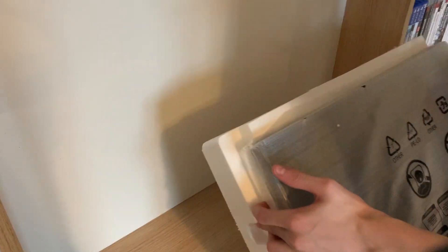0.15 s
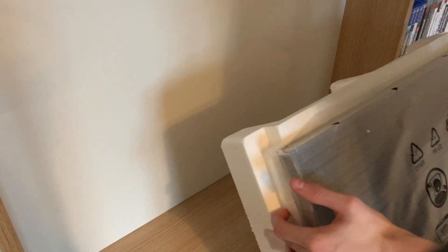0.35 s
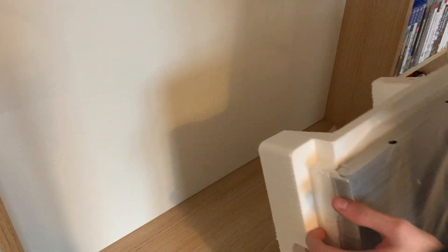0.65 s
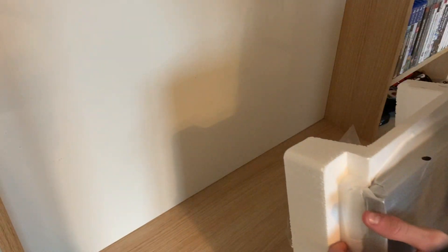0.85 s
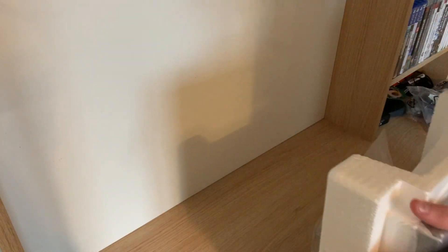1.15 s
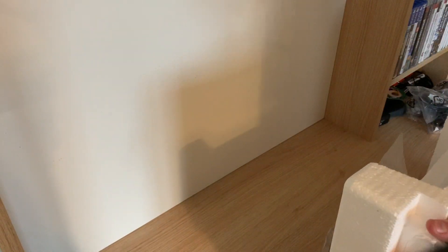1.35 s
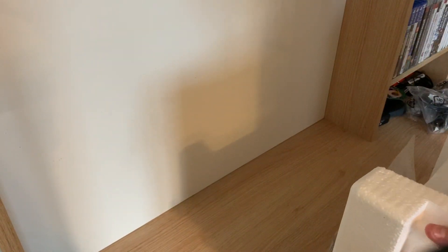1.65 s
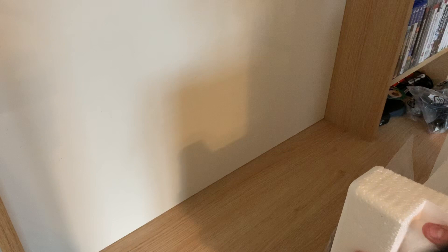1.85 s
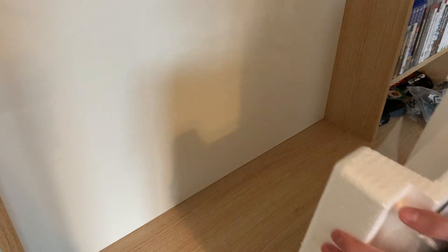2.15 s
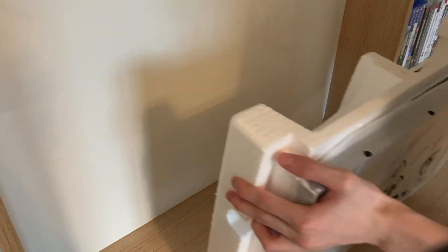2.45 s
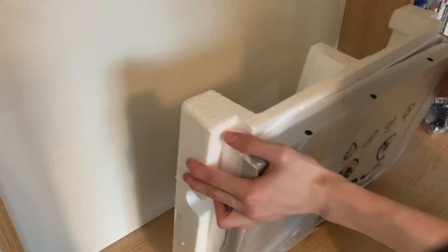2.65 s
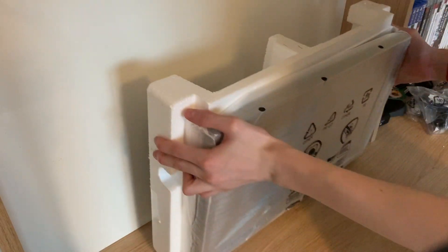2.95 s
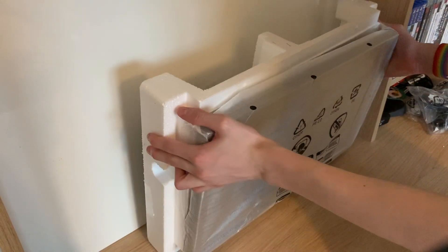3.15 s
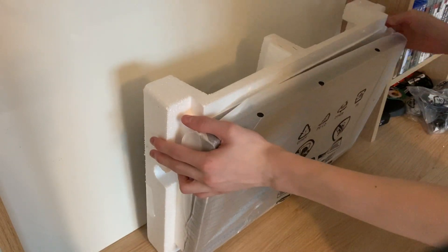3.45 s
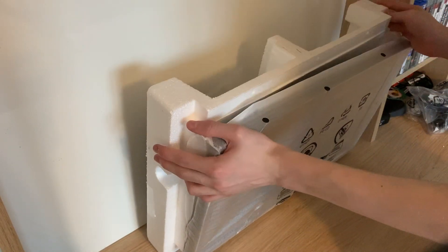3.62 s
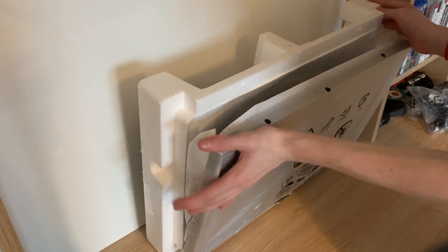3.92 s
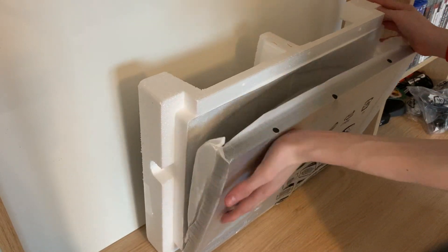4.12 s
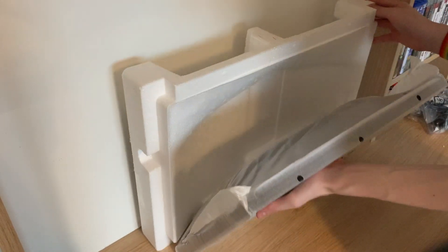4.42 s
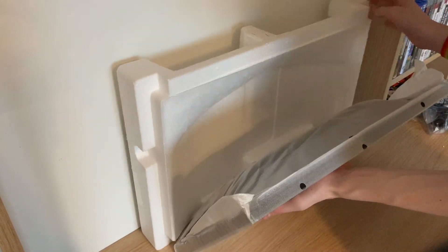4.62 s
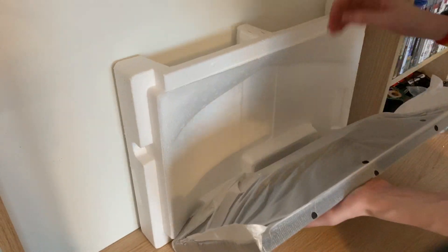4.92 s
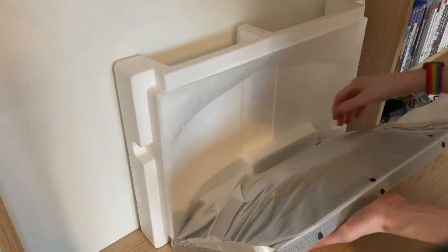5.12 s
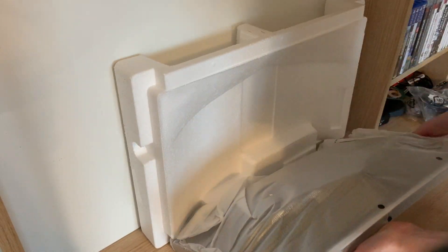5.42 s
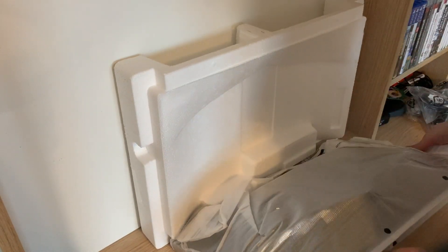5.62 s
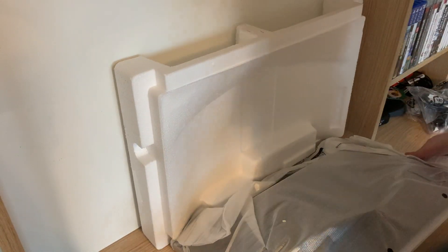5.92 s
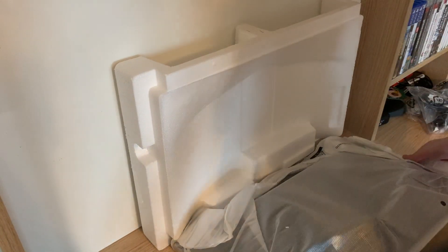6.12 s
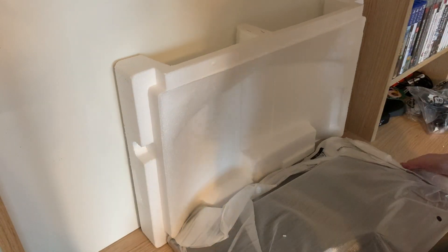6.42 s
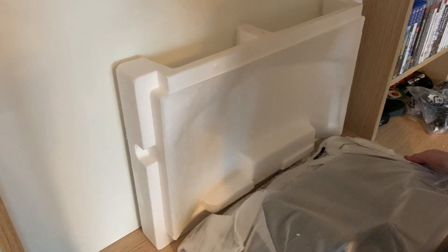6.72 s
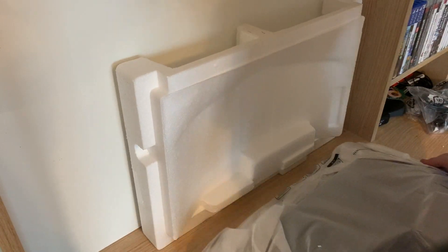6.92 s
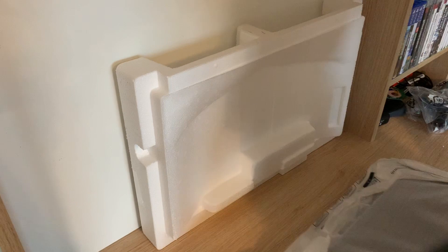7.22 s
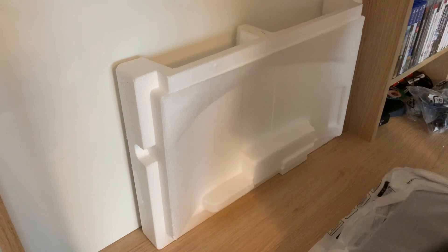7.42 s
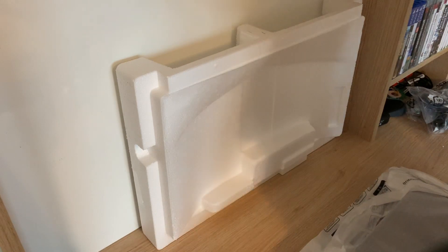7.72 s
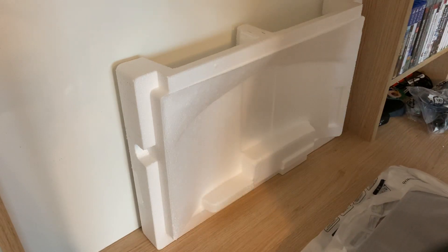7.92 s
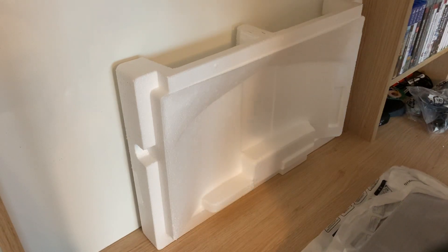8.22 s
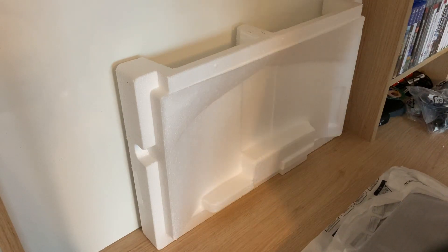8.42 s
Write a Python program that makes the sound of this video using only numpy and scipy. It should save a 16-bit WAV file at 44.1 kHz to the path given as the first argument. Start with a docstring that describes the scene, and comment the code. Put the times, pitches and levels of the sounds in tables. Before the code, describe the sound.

Hands set a foam packing tray on a wooden desk with hollow knocks, rubs and squeaks, then slide out a crinkling plastic-sleeved item.

```python
"""A short rub of foam and a patter of hollow knocks: hands carry a polystyrene packing tray over a wooden desk,
stand it on edge, ease a flat item in a plastic sleeve out, lower it and nudge it into place.
Rub, hiss, crinkle and drag are showers of tiny noise grains; slips are noise bursts that ring the tray;
scrapes and squeaks glide in pitch; bumps are damped thuds over a booming desk top.
A small room answers; a camera with closely spaced microphones stands near."""
import sys
import numpy as np
from scipy import signal
from scipy.fft import rfft, irfft, next_fast_len
from scipy.io import wavfile
from scipy.ndimage import uniform_filter1d, map_coordinates

SR = 44100
rng = np.random.default_rng(int(sys.argv[2]) if len(sys.argv) > 2 else 0)


def dump(signal):
    """Clip the signal to [-1, 1] and save it as 16-bit WAV at the path in sys.argv[1]."""
    limited = np.clip(np.atleast_2d(signal).T, -1, 1)
    pcm = np.round(limited * 32767).astype(np.int16)
    wavfile.write(sys.argv[1], SR, pcm)


N = 377496

# All levels are fader settings, trimmed again where each layer is mixed.
# faint air noise behind everything: [f/Hz, level/dB]
AIR = [(15, -76), (25, -32.5), (43, -12), (66, -12), (105, -20), (796, -35.5), (1020, -31), (5880, -44.5),
       (8140, -46), (16000, -50.5)]
# decay of the small room: [f/Hz, t60/s]
ROOM = [(100, 0.41), (400, 0.29), (1100, 0.25), (3000, 0.41), (8000, 0.24), (16000, 0.15)]
# left-right correlation at the microphones, ahead of the widening: [f/Hz, correlation -1..1]
ALIKE = [(100, 0.85), (300, 0.8), (500, 0.49), (800, 0.34), (1500, 0.37), (2000, -0.025), (3300, -0.19),
         (4300, 0.64), (5300, -0.29), (6500, 0.63), (7500, -0.13)]
# shifting weight makes the desk rumble: [start t/s, swell t/s, fade t/s, level/dB]
SHIFTS = [(0.03, 0.093, 0.24, -54), (0.5, 0.1, 1, -55.5), (1.429, 0.034, 0.41, -47),
          (1.65, 0.27, 0.23, -44), (2.751, 0.37, 0.18, -54.5), (3.23, 0.039, 0.09, -39.5),
          (3.509, 0.024, 0.14, -42), (4.12, 0.3, 0.6, -51.5), (6.23, 0.13, 0.18, -56.5),
          (7.25, 0.071, 0.24, -51.5), (7.599, 0.071, 0.15, -48.5), (8.24, 0.032, 0.15, -50)]
# colour of that rumble: [f/Hz, level/dB]
RUMBLE = [(25, -21), (45, -9), (61, -1.5), (85, -13), (135, -0.5), (175, -5.5), (240, -4), (330, -19),
          (600, -24.5)]
# weight bears on the desk:
# [t/s, contact t/s, thud level/dB, thud f/Hz, boom level/dB near 60 Hz, drone level/dB near 135 Hz]
BUMPS = [(.283, 0.0026, -31, 287, -72, -77), (.514, 0.0036, -38, 277, -72, -64.5),
         (0.789, .006, -54, 150, -61, -56), (1.089, .003, -50, 140, -56, -57),
         (1.121, 0.0027, -42.5, 252, -63, -62), (1.657, 0.0023, -30, 336, -55, -43),
         (1.684, 0.0024, -25.5, 198, -44, -38), (2.073, 0.0033, -33, 275, -60.5, -81),
         (2.797, 0.0017, -29, 396, -43.5, -46.5), (3.039, 0.0013, -21, 300, -39.5, -44),
         (3.276, 0.003, -31, 285, -62, -47), (3.532, 0.0017, -28, 290, -46, -41),
         (3.688, 0.0028, -30.5, 366, -61, -59.5), (4.29, 0.0043, -22, 232, -43, -41),
         (4.311, 0.0015, -21.5, 275, -37, -45), (4.336, 0.0018, -31, 198, -32.5, -52),
         (4.366, .0012, -23, 255, -58, -57), (4.422, 0.0014, -23, 242, -34.5, -45),
         (4.686, 0.0011, -32.5, 224, -61, -53), (5.453, 0.0028, -46, 253, -67, -70),
         (6.257, 0.0043, -43, 306, -72, -74), (6.298, .003, -38.5, 324, -66, -70),
         (6.357, 0.0047, -37.5, 403, -71, -72), (6.38, .008, -43, 261, -57, -66),
         (7.258, .002, -24.5, 232, -56, -62), (7.268, .0009, -19, 315, -40, -47),
         (7.32, 0.0081, -30, 310, -44, -60), (7.706, 0.0013, -39.5, 634, -70, -73),
         (7.719, .0009, -33, 200, -59, -55.5), (8.094, 0.0057, -34, 198, -48, -53),
         (8.125, .004, -44, 139, -53, -61)]
# ringing modes of the desk top: [f/Hz, level/dB, t60/s]
DESK_MODES = [(59.7, 0.5, .46), (135.2, 0.5, 0.36), (199, -10.5, 0.34), (231.5, -3.5, 0.27),
              (310.8, -3.5, 0.15), (404, -13.5, .15), (484, -10, 0.31), (616, -12, 0.4), (750, -16.5, .22)]
# colour of the noise in a thud: [f/Hz, level/dB]
THUD = [(60, -33), (150, -0.5), (250, 1.5), (380, -12), (550, -11.5), (900, -18.5), (2000, -45),
        (5000, -78.5)]
# brief stick-slip squeaks: [t/s, length t/s, start f/Hz, end f/Hz, level/dB]
SQUEAKS = [(1.446, 0.033, 428, 544, -35.5), (1.467, 0.024, 1303, 1990, -37.5),
           (1.485, .045, 1990, 2460, -47), (1.463, 0.068, 695.5, 661, -40), (1.516, 0.055, 678, 605, -40),
           (6.485, 0.0916, 556.4, 724, -42), (7.889, 0.022, 720, 520, -54), (8.049, 0.024, 756, 640, -51.5)]
# a foam edge scrapes along, pitch following speed: [t/s, length t/s, start f/Hz, end f/Hz, level/dB]
SCRAPES = [(2, 0.16, 522.4, 1918, -52.5), (1.8, 0.06, 790, 891, -51.5), (1.9796, .03, 1667, 1700, -37.5),
           (2.006, 0.017, 1200, 660, -41), (3.54, .065, 2200, 1250, -53), (3.863, .11, 1020, 1404, -53),
           (4.14, 0.24, 1291, 2000, -48), (1.47, 0.14, 760, 620, -45.5), (4.418, .035, 1800, 750, -45)]
# colour of a foam edge scraping at middling speed: [f/Hz, level/dB]
EDGE = [(200, -32.5), (600, -11.5), (820, -3.5), (1000, -5.5), (1250, -5.5), (1900, -13.5), (2800, -20.5),
        (4500, -40.5)]
# each push or pull of the hands: [start t/s, swell t/s, fade t/s, rub level/dB, sleeve hiss level/dB]
STROKES = [ (0.0, 0.0005, 0.062, -46.5, -53.5), (0.09, 0.16, 0.2, -53, -65.5),
           (0.44, 0.19, 0.21, -57.5, -61.5), (0.728, 0.021, 0.25, -51, -59),
           (0.871, 0.23, .24, -51.5, -46.5), (1.07, 0.056, 0.042, -63, -41),
           (1.27, 0.07, .07, -46.5, -53.5), (1.439, 0.084, 0.2, -48.5, -40.5),
           (1.62, 0.058, 0.043, -37.5, -47), (1.749, 0.1, 0.15, -38, -55), (1.838, 0.066, 0.11, -57, -37.5),
           (1.958, 0.035, 0.069, -35.5, -60), (2.357, 0.026, 0.15, -54, -57),
           (2.78, 0.023, 0.054, -41.5, -41), (2.96, 0.042, 0.21, -42, -51.5),
           (3.23, 0.074, 0.21, -52.5, -55), (3.455, 0.079, 0.038, -39, -41),
           (3.57, 0.067, 0.22, -50, -60.5), (3.68, 0.044, 0.13, -53, -51), (3.8, 0.067, 0.27, -50.5, -50),
           (4.02, 0.17, 0.073, -45, -44), (4.2, 0.1, 0.11, -41, -38), (4.35, 0.055, 0.47, -48.5, -49),
           (4.571, 0.11, 0.077, -44.5, -47.5), (4.689, 0.3, 0.1, -62.5, -50.5), (5.05, 0.13, 0.2, -59, -57),
           (5.343, 0.16, 0.24, -54, -50.5), (5.682, 0.12, 0.32, -46, -48), (5.981, 0.25, 0.43, -54.5, -51),
           (6.229, 0.089, 0.1, -46.5, -55), (6.453, 0.075, 0.066, -39.5, -54.5),
           (6.47, 0.2, 0.29, -56, -51), (7.243, 0.014, 0.15, -51.5, -63), (7.31, 0.18, 0.31, -59, -53.5),
           (7.559, 0.12, 0.17, -53.5, -54), (7.848, 0.066, 0.032, -58.5, -57.5),
           (7.948, 0.13, 0.055, -56, -57), (8.217, 0.04, 0.053, -57.5, -60.5),
           (8.38, 0.14, .1, -68.5, -68.5)]
# colour of foam beads rubbing: [f/Hz, level/dB]
RUB = [(100, -38.5), (170, -14.5), (324, -4), (371, -15.5), (462, 1), (568, -10), (625, -3), (757, -4.5),
       (1540, -9), (3070, -19), (3330, -19), (4500, -15), (5850, -32), (9900, -120)]
# colour of the sleeve dragging over the desk: [f/Hz, level/dB]
DRAG = [(100, -58), (220, -7.5), (310, -10), (450, -0.5), (540, -3), (640, -3), (800, -5.5), (1000, -2.5),
        (1300, -7), (1900, -11), (3200, -14.5), (6000, -16)]
# resonances of the flat item as it drags: [f/Hz, width f/Hz, level/dB]
PANEL = [(285.5, 41, -3), (470, 58, 0.5), (554, 69, -1.5), (636, 58, 0.5), (940, 120, -6), (1220, 70, -1.5),
         (1506, 130, -6.5)]
# colour of the sleeve's hiss: [f/Hz, level/dB]
HISS = [(900, -21), (1800, -6), (2900, -2.5), (3500, -5.5), (5500, -2.5), (7000, -2.5), (8800, 2.5),
        (11000, 1), (16000, -1)]
# colour of crunching beads and of the crinkling sleeve: [f/Hz, level/dB]
CRUNCH = [(400, -4), (1500, -3), (2800, -3.5), (3600, -3.5), (5500, 0.5), (6900, 2.5), (9000, 4),
          (12000, 2), (16000, -1.5)]
# resonances of the foam walls in a hard clack: [f/Hz, width f/Hz, level/dB]
CLACK = [(850, 280, -5.5), (1040, 310, -4), (1420, 420, -7.5), (1610, 230, -6), (1937, 860, -17),
         (2893, 310, -5.5)]
# resonances of the hollow foam tray: [f/Hz, width f/Hz, level/dB]
HOLLOW = [(286, 103, 2.5), (460, 140, -0.5), (645, 80, -1)]
# ringing modes of the tray: [f/Hz, level/dB, t60/s]
TRAY_MODES = [(289.4, 6.5, 0.062), (415, 1.5, 0.047), (619, 0.5, 0.065), (828, 0.5, 0.13),
              (1102, -5.5, 0.082), (1320, -12, 0.032), (1664, -8.5, 0.052), (2940, -24, 0.069)]
# the foam catches and lets go:
# [t/s, length t/s, crunch level/dB, clack level/dB, clack f/Hz, hollow knock level/dB, knock f/Hz]
SLIPS = [(0.091,0.0072,-54,-48.5,1078,-41.5,292), (0.115,0.0038,-34,-44,1280,-40.5,287),
         (0.142,0.0068,-49,-45,988,-39,295), (.169,0.0058,-47.5,-43,790,-36.5,280),
         (0.19,0.0055,-42.5,-44,896,-37.5,270), (0.232,.003,-39.5,-54,1100,-44,290),
         (0.25,0.0059,-28,-40,952,-33.5,275), (0.275,.0029,-26,-37.5,950,-36,280),
         (.283,0.0065,-49,-44,813,-33.5,263), (0.364,0.0028,-29.5,-40.5,1910,-58,293),
         (0.509,0.0031,-31,-62,1270,-45,275), (0.555,0.0071,-42,-49,836,-40.5,294),
         (0.579,0.0073,-36.5,-47,900,-41,282), (0.617,0.0058,-39.5,-47,920,-41,292),
         (0.638,.005,-53,-55,800,-45,283), (0.754,0.0087,-32,-53,800,-43,290),
         (0.999,0.0065,-34.5,-43.5,900,-50,326), (1.088,0.0048,-32.5,-45,875,-56,320),
         (1.288,0.0048,-37.5,-41,776,-40.5,240), (1.35,0.0052,-32.5,-58,1125,-36.5,468),
         (1.3966,0.0045,-30,-45,1086,-49,285), (1.421,0.0077,-27,-57,1660,-49,430),
         (1.445,0.0083,-43,-34.5,736,-31,433), (1.493,.0089,-20.5,-41.5,751,-54,690),
         (1.652,0.0092,-25,-36.5,854,-29,308), (1.757,0.0077,-62.5,-41,653,-27.5,418),
         (1.964,0.0081,-14,-45,1303,-43,288), (1.975,0.0051,-25,-21.5,1433,-25.5,398),
         (2.002,0.0058,-23.5,-26.5,943,-25,428), (2.066,0.0052,-13.5,-38,1078,-27,272),
         (2.073,0.0052,-26.5,-45,603,-31,326), (2.351,0.0053,-39,-55.5,1525,-71,320),
         (2.368,0.0085,-22.5,-47,1166,-50,740), (2.378,0.0072,-22,-45,1390,-36,254),
         (2.435,0.0042,-36,-46,918,-46,285), (2.471,0.0047,-32,-40,952,-40.5,390),
         (2.502,0.005,-35.5,-42.5,1000,-40,356), (2.688,0.0095,-36,-47.5,897,-45.5,480),
         (2.758,0.0075,-42.5,-50,1110,-46.5,370), (2.787,0.0073,-22.5,-37,1363,-38,300),
         (2.796,0.0071,-19,-31.5,651,-24.5,472), (2.978,0.0033,-34.5,-46.5,913,-43.5,363),
         (3.005,0.0068,-14,-31,923,-24.5,470), (3.032,0.0052,-24,-35,1313,-26,390),
         (3.036,0.0062,-13,-18,1020,-14.5,331), (3.057,0.0059,-35.5,-38.5,1237,-27.5,314),
         (3.258,0.0051,-22,-30,1053,-32.5,295), (3.275,0.0038,-17.5,-30,1074,-30.5,400),
         (3.322,0.0089,-24,-38.5,1135,-33,300), (3.53,0.0077,-28.5,-33.5,966,-28.5,295),
         (3.544,.004,-34.5,-38,1122,-45,400), (3.686,0.0024,-24.5,-44.5,850,-37.5,302),
         (3.689,0.0055,-40.5,-35,777,-36.5,327), (3.752,0.0074,-40.5,-39.5,837,-47,380),
         (3.762,0.0037,-42.5,-45,1300,-52,330), (3.779,0.0058,-42.5,-44,826,-47,323),
         (3.885,0.0071,-40.5,-52,1165,-38,338), (3.914,0.0038,-42.5,-45,1382,-51,310),
         (3.944,0.0033,-40.5,-45,1160,-47,310), (4.026,0.0039,-40,-55,910,-44,355),
         (4.084,0.0058,-36.5,-46.5,1007,-41.5,355), (4.089,0.0064,-27,-42.5,1202,-45,390),
         (4.163,0.0031,-38.5,-43,1113,-50,324), (4.363,0.0046,-35,-46,1240,-29.5,386),
         (4.42,0.0075,-29,-36.5,1100,-27,402), (4.595,0.0053,-29,-64,940,-56,400),
         (4.635,0.0068,-38,-47,900,-46,420), (4.649,0.0089,-26,-38,1116,-43,544),
         (4.708,.005,-38.5,-41,980,-47,400), (5.413,0.0042,-34,-52.5,1540,-65,544),
         (5.443,0.0062,-41.5,-44.5,1120,-48,566), (6.726,0.0066,-41,-46.5,1130,-49,570),
         (7.095,0.0031,-57,-70,1500,-72,399), (7.251,0.0049,-62,-38.5,1300,-31,488),
         (7.26,0.0081,-60,-42,730,-31.5,506), (7.268,0.008,-58,-45,744,-29,483),
         (7.664,0.0069,-45,-48,836,-50,260), (8.312,0.0034,-47,-47,1113,-45,212)]

TOP_HZ = 15850  # nothing is heard from here up
EDGE_HZ = 1000  # pitch of the edge's rasp at normal speed
ON_DESK, CROSSFADE = 4.69, 0.89  # s: the sleeve starts to drag on the desk, and takes over from the foam
# flanks of a stroke (1 = straight ramps); desk rumble relative to the rub, dB
SWELL_POWER, RUB_SHAKE_DB = 0.78, -16.5
# knock delay as a share of the slip's length; t60 of the flexing foam wall in cycles
KNOCK_LAG, FLEX_CYCLES = 0.296, 12.3
# t60 of a thud: so many cycles plus so many contact times
THUD_CYCLES, THUD_CONTACTS = 9.2, 14


def amp(db):
    """Decibels to gain."""
    return 10 ** (np.asarray(db) / 20)


def unit(x):
    """Scale to rms 1."""
    return x / np.sqrt(np.mean(x ** 2) + 1e-20)


def along(points, hz):
    """Read (Hz, value) points on a log frequency axis."""
    f, v = np.transpose(points)
    return np.interp(np.log(hz + 1), np.log(f + 1), v)


def wobble(rate):
    """A smooth random curve with rate knots a second."""
    knots = rng.standard_normal(int(N * rate / SR) + 4)
    return map_coordinates(knots, [np.arange(N) * rate / SR])


def filtered(x, response):
    """Apply a gain that depends on frequency."""
    m = next_fast_len(N + SR // 2)
    spectrum = rfft(x, m) * response(np.fft.rfftfreq(m, 1 / SR))
    return irfft(spectrum, m)[..., :N]


def coloured(x, spectrum):
    """Shape x with a spectrum table; rms 1."""
    return unit(filtered(x, lambda hz: amp(along(spectrum, hz))))


def noise(spectrum):
    """Two unrelated coloured noises."""
    return coloured(rng.standard_normal((2, N)), spectrum)


def resonant(x, modes):
    """Pass x through broad resonances of alternating sign, rolled off above the last; rms 1."""
    def response(f):
        total = 0
        for k, (centre, width, db) in enumerate(modes):
            damping = 1j * f * width
            total = total + (-1) ** k * amp(db) * damping / (centre ** 2 - f ** 2 + damping)
        return total / (1 + (f / (2 * modes[-1][0])) ** 2)
    return unit(filtered(x, response))


def add(track, s, sound):
    """Mix a sound into the track at time s."""
    part = track[:, max(round(s * SR), 0):][:, :sound.shape[-1]]
    part += sound[..., :part.shape[-1]]


def burst(t, rise, t60):
    """An envelope of peak 1 that swells and dies away."""
    shape = (1 - np.exp(-t / rise)) ** 2 * amp(-60 * t / t60)
    return shape / shape.max()


def swells(timing, levels_db):
    """Gain of strokes that each swell from rest and fade again; overlapping strokes add in power."""
    power = np.zeros((1, N))
    for (start, swell, fade), db in zip(timing, levels_db):
        t = np.arange(round((swell + fade) * SR)) / SR
        speed = np.interp(t, [0, swell, swell + fade], [0, 1, 0])
        add(power, start, (amp(db) * speed ** SWELL_POWER) ** 2)
    return np.sqrt(power[0])


def grains(rate, spread_db, life):
    """Random stick-slip releases, rate a second, each a puff of noise of its own size dying over life s."""
    sizes = (rng.random(N) < rate / SR) * amp(spread_db * np.minimum(rng.standard_normal(N), 2.5))
    power = signal.lfilter([1], [1, -np.exp(-2 / (life * SR))], sizes ** 2)
    return unit(np.sqrt(power) * rng.standard_normal((2, N)))


def shifting(x, patchy_db):
    """As the contact point moves, different resonances stand out for a moment."""
    z = signal.stft(x, nperseg=1024)[2]
    field = uniform_filter1d(rng.standard_normal(z.shape[1:]), size=4, axis=0)  # smooth over frequency
    field = uniform_filter1d(field, size=6, axis=1)  # and over time
    return unit(signal.istft(z * amp(patchy_db * unit(field)), nperseg=1024)[1][:, :N])


def glide(x, s, hz):
    """Play the edge's rasp faster or slower, so that it centres on hz at each sample."""
    position = s * SR / 2 + np.cumsum(hz) / EDGE_HZ  # each event reads its own stretch
    return unit(np.array([map_coordinates(c, [position], order=1, mode="wrap") for c in x]))


def air():
    """Steady coloured noise lies faintly under the handling."""
    return amp(-69.5) * noise(AIR)


def room(x, count=12):
    """A short diffuse tail that changes as the tray and hands move."""
    wet, now = np.zeros((2, N)), np.arange(N) / N * (count - 1)
    for place in range(count):
        hz, t, z = signal.stft(rng.standard_normal((2, SR // 2)), SR, nperseg=256)
        decay = amp(-60 * t / along(ROOM, hz)[:, None]) * (1 - np.exp(-t / 0.001))
        tail = signal.istft(z * decay, SR, nperseg=256)[1]
        tail = tail / np.linalg.norm(tail[0])
        share = np.maximum(1 - abs(now - place), 0)  # crossfade from place to place
        near = np.flatnonzero(share)
        add(wet, near[0] / SR, signal.fftconvolve(x[:, near] * np.sqrt(share[near]), tail, axes=1))
    return wet


def desk_rumble(rub_gain):
    """Shifting weight and the rub itself shake the desk into a low rumble."""
    shifts = np.array(SHIFTS)
    weight_gain = swells(shifts[:, :3], shifts[:, 3] - 1.5)
    return noise(RUMBLE) * np.hypot(weight_gain, rub_gain * amp(RUB_SHAKE_DB))


def bumps():
    """A padded weight lands: a dull thud pitched by the place of contact, then the desk top booms on."""
    out, push, t = np.zeros((2, N)), np.zeros((1, N)), np.arange(SR) / SR
    for s, contact, thud_db, thud_hz, boom_db, drone_db in BUMPS:
        blow = [(60, boom_db + 3.5), (135, drone_db + 3.5), (200, thud_db - 17)]
        for hz, db, t60 in DESK_MODES:
            # low modes take longer to build up; the ring goes to the first channel, the mid
            ring = burst(t, 0.37 / hz, t60) * np.sin(2 * np.pi * hz * t)
            add(out[:1], s, amp(db + along(blow, hz)) * ring)
        press = amp(thud_db) * burst(t, contact, THUD_CYCLES / thud_hz + THUD_CONTACTS * contact)
        add(out[:1], s, amp(-8.0) * press * np.sin(2 * np.pi * thud_hz * t))
        add(push, s, amp(-11.5) * press)
    return out + push * noise(THUD)


def squeaks():
    """Fast, uneven stick-slip makes a short, hoarse, gliding tone."""
    out = np.zeros((2, N))
    unsteady = wobble(500)
    for s, length, start_hz, end_hz, db in SQUEAKS:
        u = np.linspace(0, 1, max(round(length * SR), 2))
        hz = start_hz + (end_hz - start_hz) * u
        hz = hz * np.exp(0.093 * unsteady[round(s * SR):][:len(u)])
        phase = 2 * np.pi * np.cumsum(hz) / SR + 2 * np.pi * rng.random((2, 1))
        tone = np.sin(phase) + 0.19 * np.sin(2 * phase)
        add(out, s, amp(db) * np.sin(np.pi * u) * tone)
    return out


def scrapes():
    """A foam edge rasps in a band of noise that slides with the speed."""
    out = np.zeros((2, N))
    rasp = coloured(grains(rate=1000, spread_db=-3, life=0.0022), EDGE)
    for s, length, start_hz, end_hz, db in SCRAPES:
        u = np.linspace(0, 1, max(round(length * SR), 2))
        hz = start_hz * (end_hz / start_hz) ** u
        add(out, s, amp(db) * np.sin(np.pi * u) * glide(rasp, s, hz))
    return out


def sleeve(hiss_gain):
    """Plastic film hisses in dense grains and crinkles in sparse, uneven ones."""
    film = coloured(grains(rate=1300, spread_db=2.6, life=.006), HISS) * amp(.6 * wobble(35))
    hiss = shifting(film, patchy_db=3.0) * hiss_gain * amp(3.0)
    crinkle = coloured(grains(rate=110, spread_db=8, life=0.0019), CRUNCH) * hiss_gain * amp(-10.0)
    return hiss + crinkle


def rubbing(rub_gain):
    """Foam beads rasp, snag and judder; later the sleeved item drags over the desk instead."""
    on_desk = np.clip((np.arange(N) / SR - ON_DESK) / CROSSFADE, 0, 1)
    rasp = coloured(grains(rate=700, spread_db=4, life=.006), RUB) * amp(1.4 * wobble(30))
    friction = coloured(grains(rate=1400, spread_db=3, life=.0035), DRAG)
    panel = resonant(grains(rate=990, spread_db=2, life=0.0032), PANEL)
    drag = unit(amp(-0.5) * friction + panel)
    contact = np.sqrt(1 - on_desk) * rasp * amp(-1.5) + np.sqrt(on_desk) * drag
    rub = shifting(contact, patchy_db=2.5) * rub_gain * amp(-2.03)
    # single beads snag and tick against the tray, and small slips make it judder hollowly
    snags = resonant(grains(rate=130, spread_db=3.5, life=0.0012), CLACK) * rub_gain * amp(-11)
    judder = resonant(grains(rate=110, spread_db=1.5, life=0.0027), HOLLOW)
    return rub + snags + judder * rub_gain * (1 - on_desk) * amp(-9)


def sliding():
    """The strokes of the hands drive desk rumble, sleeve and rub together."""
    strokes = np.array(STROKES)
    rub_gain = swells(strokes[:, :3], strokes[:, 3])
    hiss_gain = swells(strokes[:, :3], strokes[:, 4])
    return desk_rumble(rub_gain) + sleeve(hiss_gain) + rubbing(rub_gain)


def tray_ring(t):
    """The whole tray rings, its modes weighted at random for each place of contact."""
    ring = 0
    for hz, db, t60 in TRAY_MODES:
        gain = amp(db + rng.normal(0, 1.6, (2, 1)))
        ring = ring + gain * burst(t, 0.0012, t60) * np.sin(2 * np.pi * (hz * t + rng.random((2, 1))))
    return unit(ring)


def slips():
    """Beads crunch briefly and the edge clacks hard; then the light, well damped tray knocks."""
    out, t = np.zeros((2, N)), np.arange(SR // 5) / SR
    releases = grains(rate=2000, spread_db=2.5, life=0.0007)
    beads = coloured(releases + 0.58 * rng.standard_normal((2, N)), CRUNCH)
    beads = shifting(beads, patchy_db=3.0)
    hollow = resonant(rng.standard_normal((2, N)), HOLLOW)
    edge, walls = noise(EDGE), resonant(rng.standard_normal((2, N)), CLACK)
    for s, length, crunch_db, clack_db, clack_hz, knock_db, knock_hz in SLIPS:
        start = int(np.clip(s * SR, 0, N - len(t)))
        here, knock_s = slice(start, start + len(t)), s + KNOCK_LAG * length
        # beads, edge and walls start almost together, the hollow knock just after:
        # (sound, level/dB, onset t/s, t60 in slip lengths)
        parts = [(beads[:, here], crunch_db - 26.5, s - .0003, 6),
                 (glide(edge, s, np.full(len(t), clack_hz)), clack_db - 21, s, 5),
                 (walls[:, here], clack_db - 28, s, 5.5),
                 (hollow[:, here], knock_db - 24.5, knock_s, 7)]
        for source, db, onset, lengths in parts:
            sound = source * burst(t, length / 3, lengths * length)
            add(out, onset, amp(db) * np.array([unit(c) for c in sound]))
        # the edge and the wall under the contact each flex for a few cycles at their own pitch
        flexes = [(clack_hz, clack_db - 26, 5 * length), (knock_hz, knock_db - 21.0, FLEX_CYCLES / knock_hz)]
        for hz, db, t60 in flexes:
            flex = burst(t, length / 1.9, t60) * np.sin(2 * np.pi * hz * t)
            add(out[:1], knock_s, amp(db) * unit(flex))
        add(out, knock_s, amp(knock_db - 28.0) * tray_ring(t))
    return out


def scene():
    """Mix the handling, room and air, then decode mid and side so the bass is nearly alike in both channels."""
    slide, slip, bump = sliding() + scrapes() + squeaks(), slips(), bumps()
    wet = room(amp(-8.0) * slide + amp(-6.5) * slip + amp(-8.5) * bump)
    pair = slide + slip + bump + wet + air()

    def likeness(hz):
        return np.sqrt((1 + np.clip(along(ALIKE, hz), -1, 1) * [[1], [-1]]) / 2)
    mid, side = filtered(pair, likeness)
    return np.array([mid + side, mid - side])


def record(dry):
    """The camera cuts deepest bass and top treble; its widening puts the treble alternately in and out of phase."""
    def widening(hz):
        comb = np.clip(1.15 * np.cos(2 * np.pi * (hz - 10950) / 4850), -.9995, .9995)
        onset = np.clip((hz - 7000) / 1100, 0, 1)  # full from 8100 Hz up
        return np.sqrt(1 + onset * comb * [[1], [-1]])

    def passband(hz):
        low_cut_hz = 40
        return (hz < TOP_HZ) * hz ** 4 / (hz ** 4 + low_cut_hz ** 4)
    mid, side = filtered(np.array([dry[0] + dry[1], dry[0] - dry[1]]) / 2, widening)
    return filtered(np.array([mid + side, mid - side]), passband)


dry = scene()
out = record(dry)
dump(out)
```